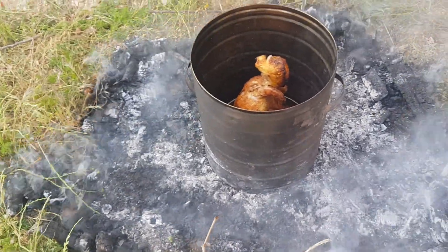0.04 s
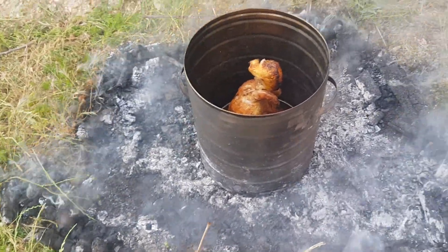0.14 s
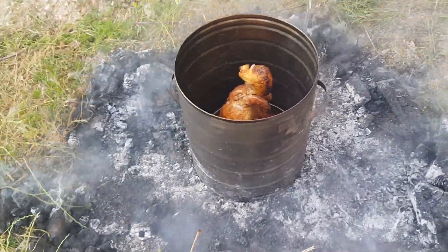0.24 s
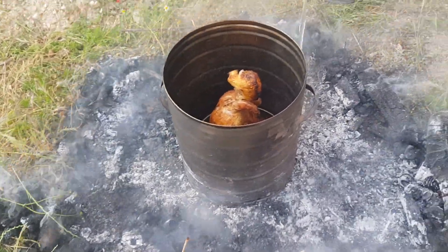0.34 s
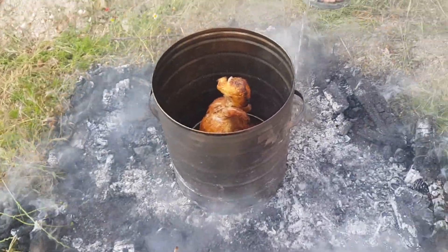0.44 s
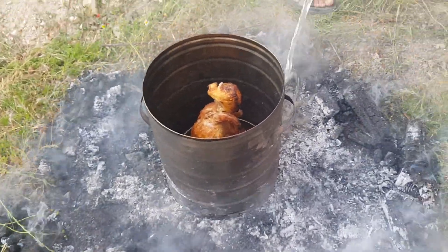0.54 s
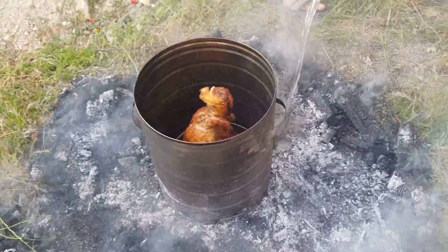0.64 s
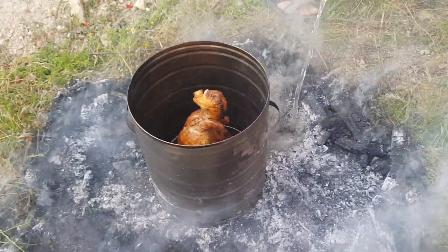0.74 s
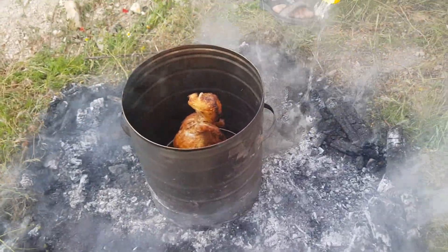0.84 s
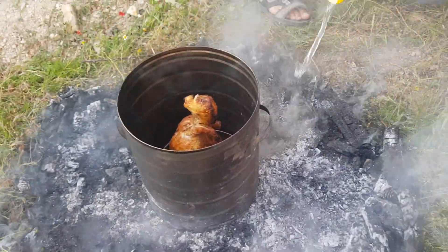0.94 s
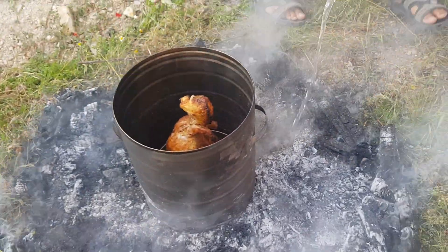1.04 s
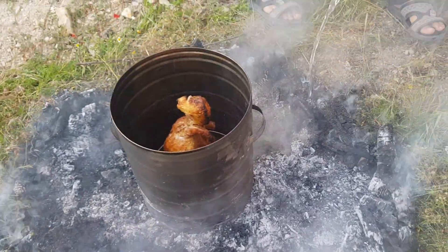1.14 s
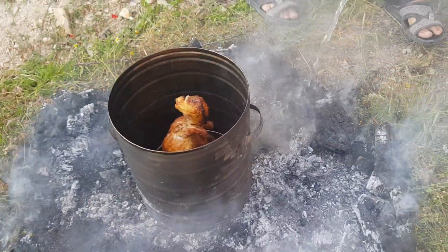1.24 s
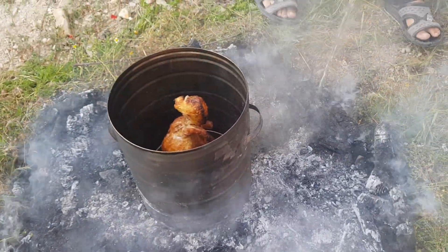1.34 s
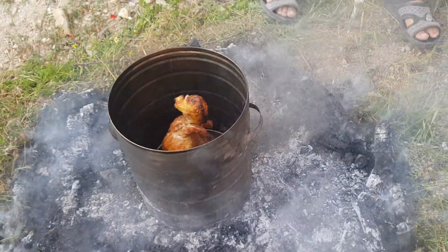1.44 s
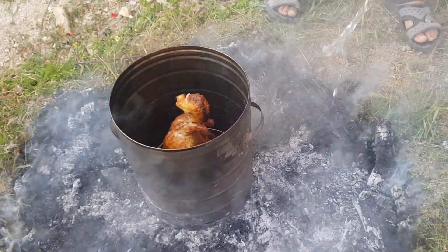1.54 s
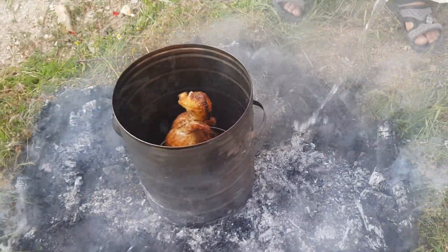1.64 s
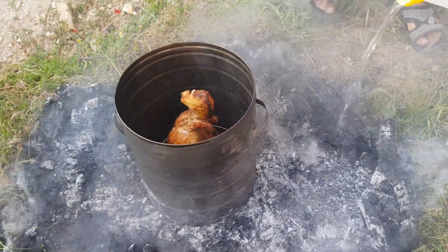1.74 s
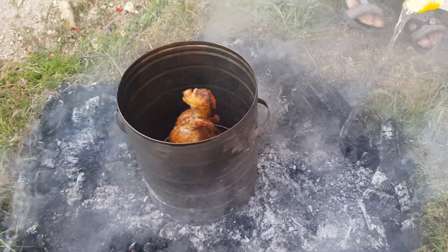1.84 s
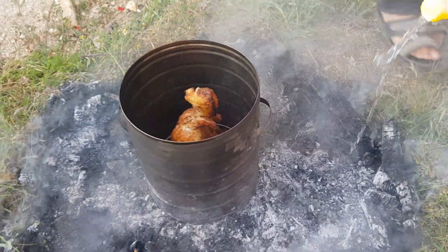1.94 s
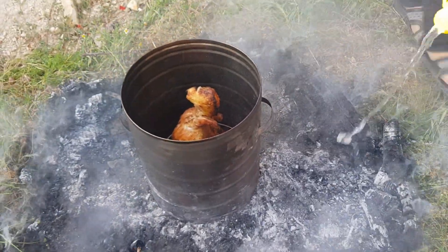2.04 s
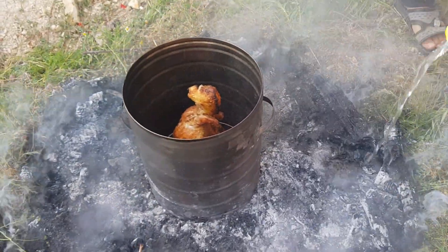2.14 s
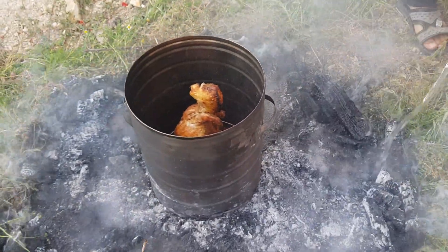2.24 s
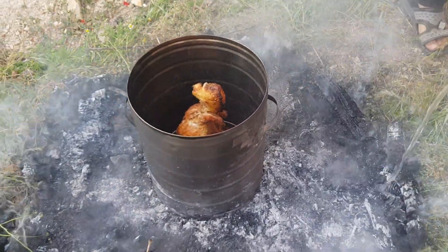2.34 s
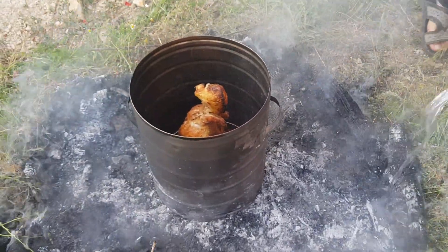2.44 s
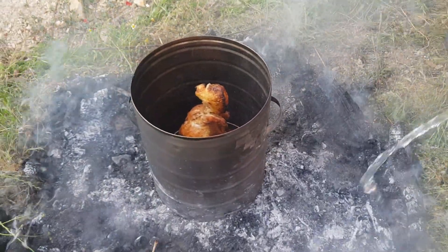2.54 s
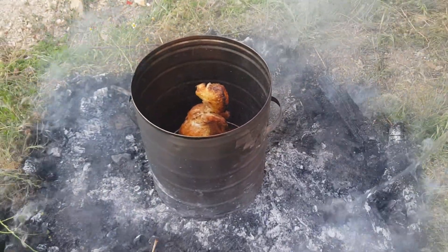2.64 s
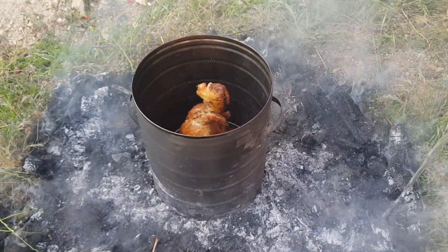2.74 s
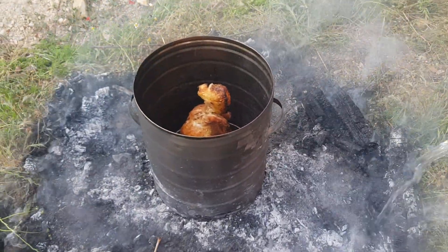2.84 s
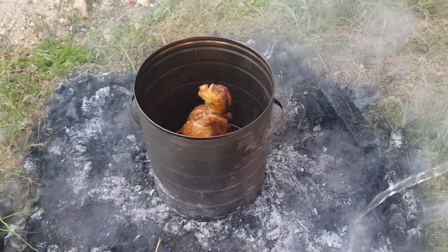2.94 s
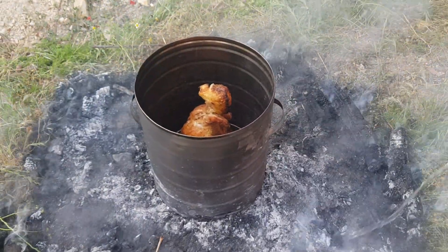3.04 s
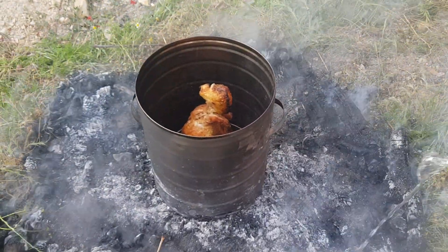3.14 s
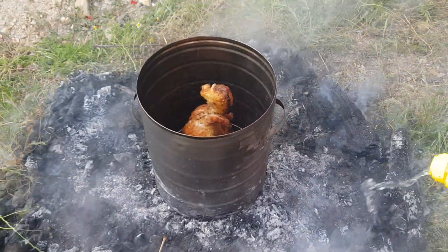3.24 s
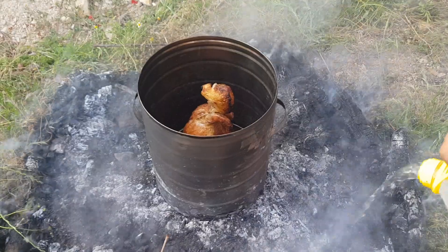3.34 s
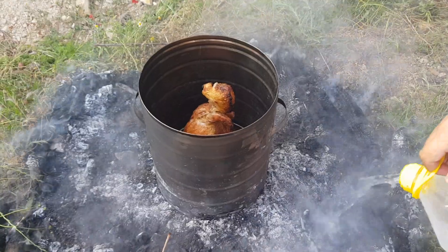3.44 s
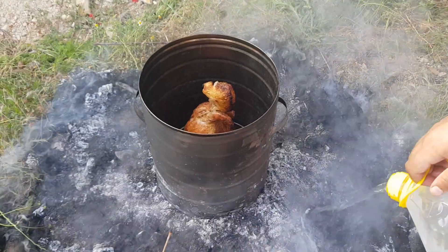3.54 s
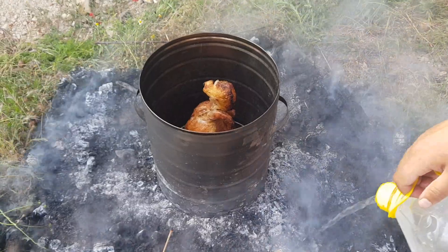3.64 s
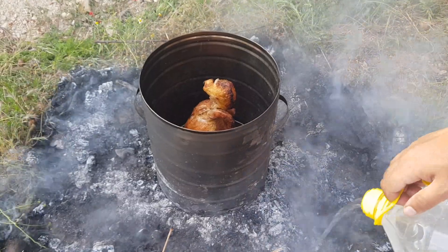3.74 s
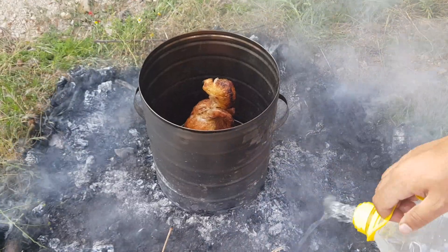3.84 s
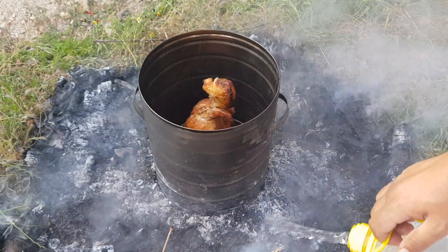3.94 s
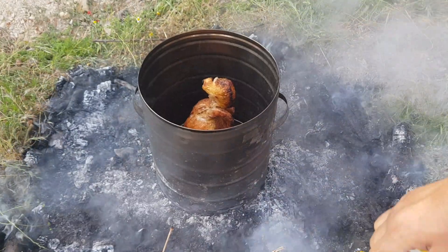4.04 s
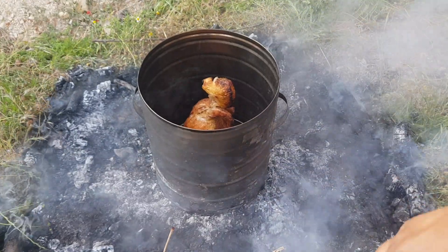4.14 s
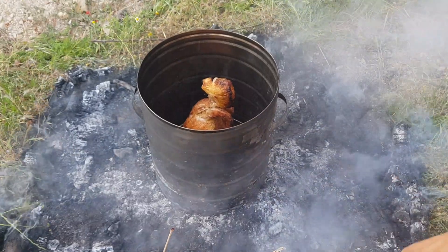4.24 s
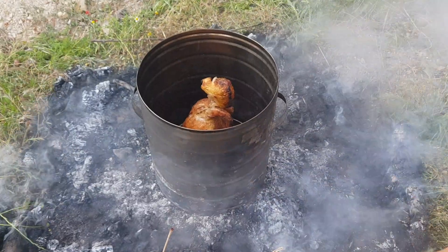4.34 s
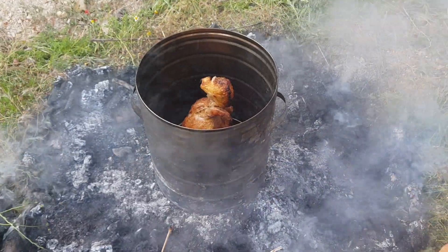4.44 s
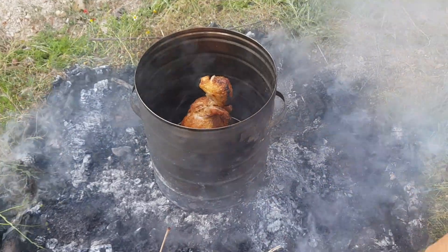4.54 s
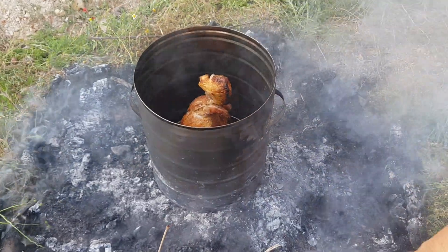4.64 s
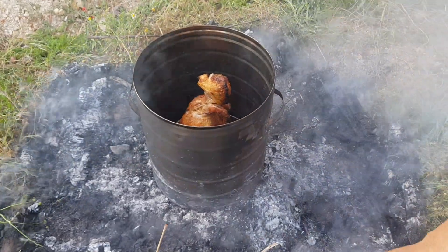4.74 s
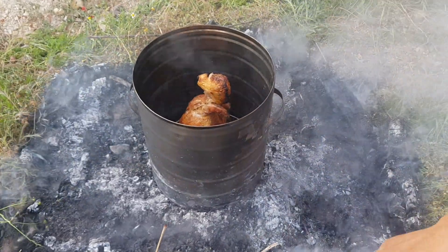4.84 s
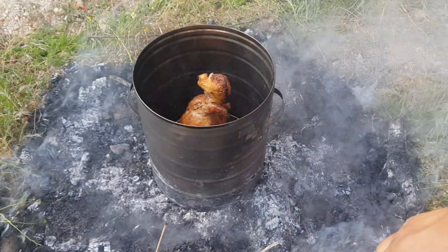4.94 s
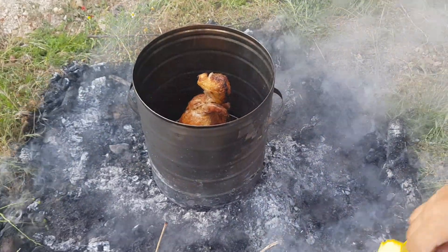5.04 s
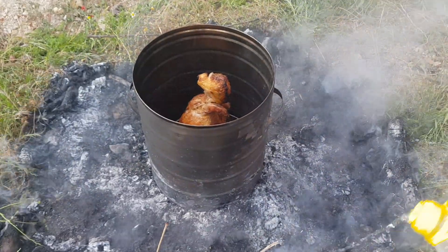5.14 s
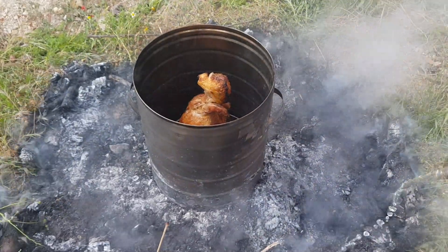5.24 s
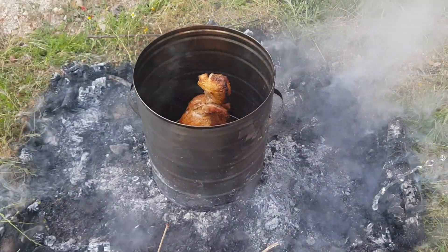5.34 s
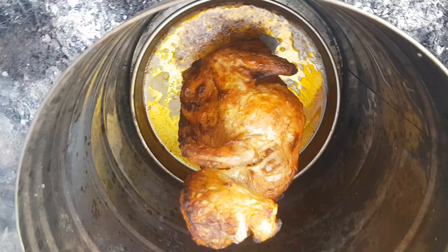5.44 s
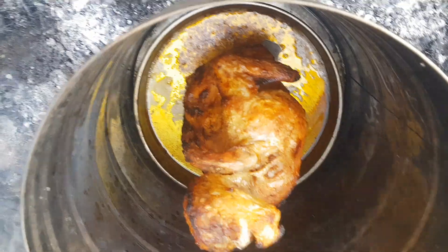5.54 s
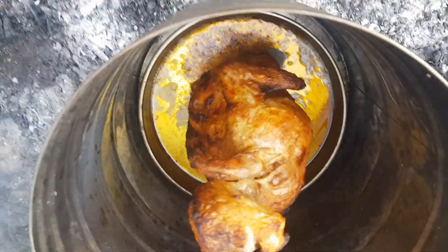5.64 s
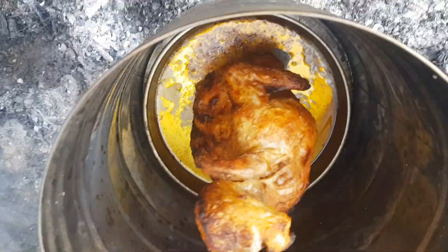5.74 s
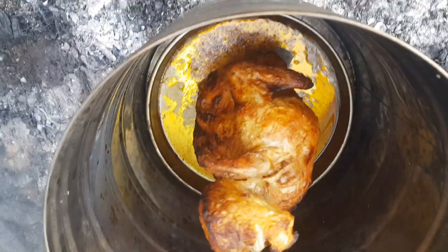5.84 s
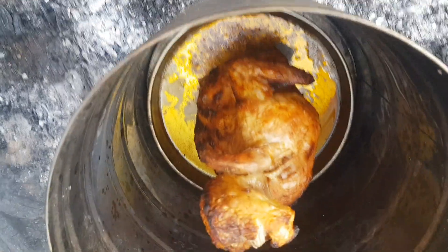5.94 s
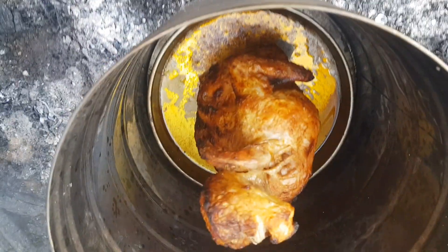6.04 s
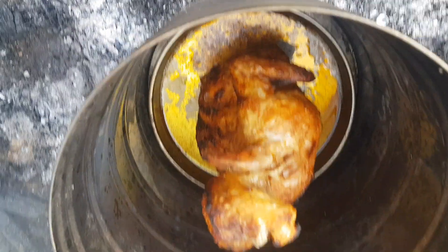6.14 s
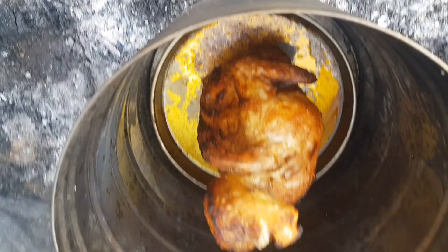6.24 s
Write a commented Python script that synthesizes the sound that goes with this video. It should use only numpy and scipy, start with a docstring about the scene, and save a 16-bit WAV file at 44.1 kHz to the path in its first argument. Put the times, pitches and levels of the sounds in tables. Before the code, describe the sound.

A loud steamy hiss swells as water douses hot ash around a steel drum, fizzing, pinging and knocking amid low wind thumps.

```python
"""Wind buffets a hand-held camera's two microphone ports, over faint hissing, an ember's crack and hollow
knocks. Then water from a plastic jug swells to a loud hiss on hot embers and ash round a steel drum, outdoors.
Steam, fizz, boiling and slosh are shaped noise; bubbles, knocks, pings and cracks are damped tones. Wind is
lumpy low noise, with a low thump to each gust. Near the end the sound drops abruptly to a faint hiss."""
import sys
import numpy as np
from scipy import signal
from scipy.fft import rfft, irfft, next_fast_len
from scipy.io import wavfile
from scipy.ndimage import uniform_filter1d, map_coordinates

SR = 44100
rng = np.random.default_rng(int(sys.argv[2]) if len(sys.argv) > 2 else 0)


def pcm_store(signal):
    """Save signal as 16-bit PCM."""
    levels = np.round(np.clip(np.atleast_2d(signal), -1, 1) * 32767)
    wavfile.write(sys.argv[1], SR, levels.astype(np.int16).T)


N = 278271  # samples

# Dousing under the stream: t/s, steam hiss level/dB, fizz level/dB, boiling level/dB
POUR_LEVELS = [
    (0, -49.5, -52, -56.5), (.4, -51, -53.5, -57.5), (.78, -51, -52.5, -57.5), (.88, -49.5, -48, -53.5),
    (.93, -37.5, -43.5, -46), (1.15, -40.5, -44.5, -45.5), (1.45, -44.5, -46.5, -46.5),
    (1.72, -41.5, -43.5, -47.5), (1.9, -39.5, -44, -46.5), (2.1, -41.5, -45.5, -48.5), (2.5, -40, -45, -48.5),
    (2.93, -40, -45, -48.5), (3.12, -39.5, -46, -49.5), (3.26, -40, -47.5, -53.5), (3.5, -43, -45.5, -47.5),
    (3.61, -47, -50.5, -55.5), (3.66, -43.5, -45.5, -44.5), (3.82, -45, -48, -49.5), (3.865, -49, -50, -54.5),
    (3.9, -45.5, -50.5, -48.5), (4.1, -45, -47, -51), (4.3, -47, -47.5, -51.5),
    (4.45, -47, -51.5, -53.5), (4.63, -48, -50.5, -54), (4.67, -48.5, -54, -57.5), (4.8, -49, -53.5, -58),
    (5.0, -47.5, -47, -55.5), (5.2, -49.5, -48.5, -56.5), (5.4, -48, -49.5, -52),
    (5.7, -50, -52.5, -51), (5.85, -49.5, -52.5, -58), (6.155, -52.5, -55, -62.5)]
# The faint hiss after the abrupt drop: same columns
FAINT_LEVELS = [(6.165, -72, -66, -76), (6.31, -73, -66, -78)]
# Water hits fresh coals: t/s, boiling level/dB, t60/s, steam over boiling/dB
SPLASHES = [(.028, -61, 0.11, 11), (.795, -55, 0.4, 9.5), (.899, -54, .15, 10), (1.748, -41.5, 0.53, 6.5),
            (2.49, -54, 0.083, 18), (3.148, -44, 0.45, 6.5), (3.183, -42.5, 0.36, 5),
            (3.636, -47, 0.17, -4), (3.885, -45, .12, -10), (4.102, -60, 0.063, 17), (4.134, -55, 0.12, 17),
            (4.16, -53, 0.25, 12), (4.209, -48, .3, 11.5), (4.225, -48, 0.58, 8), (5.061, -49, 0.14, 4.5),
            (5.3, -54, .1, 9), (5.45, -48, 0.36, 1), (5.38, -49, 0.28, -11), (5.5, -42, 0.23, -16),
            (5.525, -37, 0.22, -21), (5.572, -52, 0.065, 9), (5.61, -38, 0.21, -34), (5.727, -57, 0.06, 15)]
# Spectrum shape of the steam: f/Hz, relative level/dB per Hz
STEAM_SPECTRUM = [(4500, -54), (6500, -1.5), (7500, -10.5), (9000, -7), (10300, -1.5), (11500, -0.5),
                  (13000, -2), (15000, -2.5), (17000, -6.5)]
# Spectrum shape of the fizz: f/Hz, relative level/dB per Hz
FIZZ_SPECTRUM = [(1650, -24), (2400, -12), (2800, -8.5), (3270, -0.5), (4110, -4.5), (4550, -2.5),
                 (5010, -3), (6150, -2), (7500, -16.5), (9750, -30), (16500, -120)]
# Spectrum shape of the boiling: f/Hz, relative level/dB per Hz
BOIL_SPECTRUM = [(180, -18.5), (400, -9.5), (720, -7), (950, -3), (1500, -4), (1750, -8.5), (2700, -9.5),
                 (3900, -54)]
# Bands lifted by drum and ground: f/Hz, width/Hz, lift level/dB
DRUM_BANDS = [(963, 280, 3), (1506, 140, 2), (1926, 120, 6), (2452, 37, 9.5), (2550, 150, 0.5),
              (2920, 86, 11)]
# Bubbles whistling out of wet char: t/s, level/dB, centre f/Hz
WHISTLE = [(0, -74, 2660), (.25, -61, 2550), (.85, -63.5, 2440), (.95, -71, 2180), (1.2, -57, 2230),
           (1.72, -62, 2190), (1.95, -52, 2290), (2.4, -56, 2200), (2.75, -55, 2410), (3.3, -53, 2214),
           (3.6, -57.5, 2460), (3.83, -58, 2190), (4.05, -60, 2280), (4.25, -54, 2290), (4.66, -60.5, 2365),
           (5.1, -51.5, 2390), (5.25, -52, 2760), (5.4, -52, 2260), (5.5, -48, 2540), (5.75, -57, 2390),
           (5.88, -53, 2890), (5.95, -52, 2300), (6.03, -53.5, 2800), (6.15, -55.5, 2730),
           (6.17, -80, 2680), (6.31, -80, 2300)]
# Water sloshing in the jug: t/s, level/dB
JUG_LEVELS = [(0, -59), (.75, -66), (.95, -53), (1.4, -52.5), (1.7, -63), (2.0, -57.5), (2.3, -52),
              (2.9, -54.5), (3.3, -61.5), (3.8, -55.5), (4.3, -58), (4.62, -64), (4.67, -77), (4.8, -84),
              (4.85, -63), (5.05, -61.5), (5.5, -53), (5.75, -49.5), (5.88, -58), (5.92, -62.5),
              (6.15, -77), (6.19, -76), (6.31, -79)]
# Low thuds swell the hollow noise: t/s, level/dB, held/s
THUDS = [(.38, -56, .02), (.69, -53, .02), (1.748, -44, 0.025), (2.42, -45, 0.02), (2.61, -57, 0.012),
         (3.025, -50, 0.014), (3.14, -48, 0.056), (3.26, -52, .03), (3.42, -56, 0.048),
         (3.636, -49, 0.07), (3.875, -52, 0.043), (4.21, -64, .05), (5.064, -45.5, 0.084),
         (5.31, -58, 0.024), (5.38, -49, 0.015), (5.53, -41, 0.042), (5.565, -45, 0.077),
         (5.682, -40.5, 0.012)]
# Spectrum shape of the hollow jug: f/Hz, relative level/dB per Hz
HOLLOW_SPECTRUM = [(130, -9), (230, -7), (300, -6.5), (380, -5), (450, -7.5), (600, -10.5), (1000, -28.5)]
# Hollow knocks of the jug: t/s, level/dB, f/Hz, slap over tone/dB
KNOCKS = [(.169, -43.5, 420, 0), (.189, -44, 520, -8), (.37, -43, 365, -4), (0.397, -45.5, 470, -6),
          (.703, -43.5, 407, -13), (.863, -44.5, 856, 4), (1.476, -38, 900, 0), (2.163, -44, 347, -11),
          (3.413, -39.5, 230, -10), (5.063, -39, 283, -13), (5.119, -45, 432, 2), (5.297, -41.5, 724, -15),
          (5.383, -40, 710, -22), (5.476, -42, 275, -5), (5.556, -31, 390, -17), (5.571, -26, 392, -13),
          (5.603, -24.5, 372, -17), (5.609, -30.5, 913, -16), (5.637, -32.5, 295, -10),
          (5.73, -34, 374, -13)]
# Drops ring the drum: t/s, level/dB, f/Hz
PINGS = [(.1695, -53, 2110), (.9103, -44, 1980), (1.737, -43, 1940), (1.871, -41, 1760), (2.063, -37, 1860),
         (2.2, -39.5, 2205), (3.02, -45, 2500), (3.205, -37, 2370), (3.3167, -39, 1925),
         (3.3692, -52, 2150), (3.886, -48, 2520), (3.951, -37.5, 1854), (4.2113, -39, 2420),
         (4.58, -43, 1930), (4.8893, -49, 2300), (5.0768, -39, 1910), (5.4026, -32, 1940),
         (5.508, -42, 2530), (5.685, -35, 2650), (5.93, -42, 2043)]
# Embers crack: t/s, level/dB, f/Hz, left over right/dB
TICKS = [(0.0336, -26.5, 6630, -1), (3.404, -24, 3530, 4), (4.0453, -27, 10900, 4),
         (4.1021, -27.5, 5190, 0), (4.1177, -30, 5330, 1), (4.1336, -24, 4700, .5), (4.1488, -28, 4020, 2),
         (4.8938, -33.5, 6270, .5), (4.9184, -36, 12400, .5), (5.0124, -27.5, 3530, -3),
         (5.042, -32.5, 3720, 0), (5.0664, -30.5, 11000, .5), (5.263, -17, 14500, 13),
         (5.3097, -29.5, 10100, -.5), (5.509, -25, 5800, .5), (5.562, -21, 10800, .5),
         (5.577, -14, 10560, -8), (5.5857, -22.5, 6500, -11), (5.674, -30, 5500, .5),
         (5.7274, -27, 5100, 7)]
# Breeze between and under the gusts: t/s, buffet level/dB
BREEZE_LEVELS = [(0, -58.5), (2.0, -60.5), (2.3, -52.5), (3.2, -48), (3.24, -67), (3.6, -57), (3.9, -56.5),
                 (4.5, -63), (4.76, -67), (5.0, -53.5), (5.5, -64), (5.75, -58), (6.03, -76), (6.31, -78)]
# Gusts: t/s, buffet level/dB, held/s, left over right/dB (before clipping), thump f/Hz
GUSTS = [(0, -43.5, .02, -11, 70), (0.03, -39, 0.029, 0, 79), (.148, -41, 0.014, 1, 74),
         (.415, -49, 0.022, -18, 70), (.52, -53, 0.026, -18, 65.5), (.72, -58.5, .03, -21, 65),
         (.89, -57, 0.16, 2, 60), (1.05, -59, 0.11, -5, 65), (1.3, -51, .04, 0, 70),
         (1.46, -46, 0.056, 0, 65), (1.535, -47.5, .05, 4, 60), (1.748, -49.5, 0.077, 3, 65),
         (1.95, -55, 0.22, 1, 60), (2.278, -35, 0.02, 1, 70), (2.337, -37, 0.02, -8, 83),
         (2.418, -33, 0.029, -11, 70.5), (2.509, -39, 0.044, -4, 62), (2.609, -43, 0.012, -4, 62),
         (2.767, -37.5, 0.019, -14, 63), (2.821, -44.5, 0.073, -21, 60), (2.97, -37, 0.021, -20, 65),
         (3.017, -42, 0.022, -1, 59), (3.09, -45, 0.1, 4, 60), (3.645, -30.5, 0.048, -3, 56),
         (3.758, -44, 0.079, -3, 60), (4.008, -44, 0.028, -3, 61.7), (4.19, -43.5, 0.062, -7.5, 60),
         (4.34, -50, 0.034, -10, 60), (4.589, -54, 0.032, -17, 60), (4.832, -46, 0.072, -5, 59),
         (5.011, -42, .03, -6, 62), (5.1, -44, 0.027, -4, 62), (5.25, -57, 0.056, -4, 62),
         (5.551, -48, 0.1, -4, 60), (6.258, -61, .06, 21.5, 61.5)]
# Spectrum shape of the buffeting: f/Hz, relative level/dB per Hz
RUMBLE_SPECTRUM = [(12, -39), (20, -16), (48, 7), (70, 4.5), (137, -6), (216, -19.5), (300, -19),
                   (390, -72), (660, -120)]
# Likeness of the two ports' noise: f/Hz, left-right correlation
LIKENESS = [(250, 0.92), (700, 0.91), (1500, 0.89), (3000, 0.49), (6000, 0.34), (8000, 0.26), (10000, 0.21),
            (15000, 0.3)]
# The stream moves round the drum: t/s, left behind right/ms
PORT_LAG = [(0, -0.08), (.5, -0.064), (.8, -0.023), (1.9, 0.0099), (2.7, 0.09), (3.6, 0.062), (4.5, -0.03),
            (4.9, 0.041), (5.3, 0.093), (5.5, 0.29), (5.9, 0.19), (6.1, -0.018)]
# The camera body turns the left port's phase against the right's: f/Hz, turn/radians
BODY_TURN = [(2000, 0), (4000, 0.25), (7000, 1.5), (9000, 2.15), (12000, 0.85), (15000, 1.8)]

THUD_RISE_S, THUD_T60_S = 0.0061, 0.16
PING_BUBBLES_DB, PING_BUBBLES_S = -15, 0.016  # bubbles set off by a drop: level against its ping, held
KNOCK_T60_S, PING_T60_S = 0.059, 0.089
TICK_ROUGH, PING_ROUGH = 0.27, 0.037  # step of the random phase wander, radians a sample
TICK_CYCLES = 24  # to -60 dB
GUST_RISE_S, GUST_T60_S = 0.0075, 0.16
BREEZE_PAN_DB = -26  # left over right, before clipping: the breeze comes from the right
THUMP_DB, THUMP_CYCLES = 7.5, 4.4  # level over the gust's buffeting; cycles to -60 dB
TOP_HZ = 15760


def dousing():
    """Superposition of vapour noises that share one stream: each splash swells them at once and dies away."""
    steam_db, fizz_db, boil_db = curves(POUR_LEVELS + FAINT_LEVELS)
    low, mid, high = amp(boil_db), amp(fizz_db), amp(steam_db)
    for s, db, t60, treble_db in SPLASHES:
        burst = swell(s, db, held_s=0.0045, rise_s=0.0019, t60=t60)
        low = together(low, burst)
        mid = together(mid, burst * amp(treble_db / 2))
        high = together(high, burst * amp(treble_db))
    surge_db = 0.7 * wobble(11) + 0.4 * wobble(25)  # the stream breaks up unevenly
    steam_noise = rush(lambda hz: amp(along(STEAM_SPECTRUM, hz)), LIKENESS, patchy_db=1.83, spit_db=2.0)
    fizz_noise = rush(lambda hz: amp(along(FIZZ_SPECTRUM, hz)), LIKENESS, patchy_db=1.75, spit_db=1.5)
    boil_noise = rush(lambda hz: amp(along(BOIL_SPECTRUM, hz)) * lifted(hz), LIKENESS,
                      patchy_db=1.5, spit_db=0.9)
    steam = high * amp(surge_db) * steam_noise
    fizz = mid * amp(surge_db) * fizz_noise
    boil = low * amp(0.39 * surge_db) * boil_noise
    leftward = amp([[.55], [-.55]])
    return leftward * (boil + slosh()) + fizz + steam + bubbles(cycles=11.4, spread=0.468, uneven_db=0.6)


def lifted(hz):
    """Resonance: gain of the bands that drum and ground lift, each with a bell-shaped peak."""
    return amp(sum(db / (1 + (2 * (hz - c) / w) ** 2) for c, w, db in DRUM_BANDS))


def bubbles(cycles, spread, uneven_db):
    """Damped oscillation: dense short tones scattered round the whistling pitch, each from its own spot."""
    db, centre_hz = curves(WHISTLE)
    draw = rng.random((5000, 4))  # each bubble's time, pitch, strength and place
    at = (draw[:, :1] * N).astype(int)
    hz = centre_hz[at] * np.exp(spread * (draw[:, 1:2] - .5))
    k = np.arange(600)
    turns = hz * k / SR
    strength = amp(-uneven_db * np.log(draw[:, 2:3] + .02))
    tone = strength * np.sin(2 * np.pi * turns) * turns * np.exp(-3 * turns / cycles)
    shift = (8 * (draw[:, 3:] - .5)).round().astype(int)  # samples, opposite at the two ports
    pair = [np.bincount((at + k + d + 4).ravel(), tone.ravel(), N + 700)[:N] for d in (shift, -shift)]
    drops = [swell(s, ping_db + PING_BUBBLES_DB, PING_BUBBLES_S, rise_s=0.0017, t60=0.19)
             for s, ping_db, _ in PINGS]
    steady = amp(db + 1.8 * wobble(9))
    return together(steady, *drops) * unit(filtered(np.array(pair), lifted))


def slosh():
    """Cavity colouring: noise of the water in the hollow jug, swelling with each low thud."""
    slaps = [swell(*row, THUD_RISE_S, THUD_T60_S) for row in THUDS]
    level = together(amp(curves(JUG_LEVELS)[0] + 1.5 * wobble(8)), *slaps)
    noise = rush(lambda hz: amp(along(HOLLOW_SPECTRUM, hz)), LIKENESS, patchy_db=0.5, spit_db=1.15)
    return level * amp(1.95 * wobble(30)) * noise


def knocks():
    """Damped modes: a low tone of the jug and a partial at 2.3 times its pitch, with a dull noise slap."""
    out, t = np.zeros((2, N)), np.arange(SR // 3) / SR
    for s, db, hz, slap_db in KNOCKS:
        tone = np.sin(2 * np.pi * hz * t) + 0.42 * np.sin(2 * np.pi * 2.3 * hz * t)
        envelope = amp(-60 * t / KNOCK_T60_S) * (1 - np.exp(-t / 0.0024))
        dull = unit(uniform_filter1d(rng.standard_normal(len(t)), size=10))
        slap = dull * amp(slap_db - 60 * t / 0.035)
        add(out, s, amp(db) * (envelope * tone + slap), .8)
    return out


def pings():
    """Damped resonance of the drum under a drop: a high tone whose wandering phase blurs the pitch."""
    out, t = np.zeros((2, N)), np.arange(SR // 3) / SR
    for s, db, hz in PINGS:
        drift = PING_ROUGH * np.cumsum(rng.standard_normal(len(t)))
        envelope = amp(db - 60 * t / PING_T60_S) * (1 - np.exp(-t / 0.0023))
        add(out, s, envelope * np.sin(2 * np.pi * hz * t + drift), .8)
    return out


def ticks():
    """Impulse and reflection: a short ember crack and its weaker bounce off the ground."""
    out, t = np.zeros((2, N)), np.arange(SR // 50) / SR
    for s, db, hz, pan_db in TICKS:
        smear = TICK_ROUGH * np.cumsum(rng.standard_normal(len(t)))  # widens the crack round its pitch
        envelope = amp(-60 * t * hz / TICK_CYCLES) * (1 - np.exp(-t * hz))
        crack = envelope * np.sin(2 * np.pi * hz * t + smear)
        add(out, s + .001, amp(db) * crack, pan_db)
        add(out, s + .002, amp(db - 9) * crack, -pan_db)  # bounce, from the opposite side
    return out


def wind():
    """Turbulent pressure: lumpy low buffeting; the gusts favour now one port, now the other."""
    breeze = amp(curves(BREEZE_LEVELS)[0]) * port_gains(BREEZE_PAN_DB)
    gusts = [swell(s, db, held_s, GUST_RISE_S, GUST_T60_S) * port_gains(pan_db)
             for s, db, held_s, pan_db, _ in GUSTS]
    lumps = amp(1.8 * wobble(16) + 2.5 * np.array([wobble(14), wobble(20)]))  # shared, then each port's own
    rumble = rush(lambda hz: amp(along(RUMBLE_SPECTRUM, hz)), [(30, -0.081), (150, 0.12)],
                  patchy_db=0.2, spit_db=0.9)
    return together(breeze, *gusts) * unit(lumps * rumble)


def port_gains(pan_db):
    """Level difference: left and right gains, clipped to 20 dB apart, for wind on the two ports."""
    return amp(np.clip([[pan_db], [-pan_db]], -20, 20) / 2) / np.cosh(pan_db * np.log(10) / 40)


def thumps():
    """Forced vibration: each gust shakes the microphone cover for a few low cycles that swell and die."""
    out, t = np.zeros((2, N)), np.arange(SR // 3) / SR
    for s, db, _, pan_db, hz in GUSTS:
        envelope = amp(db + THUMP_DB - 60 * t * hz / THUMP_CYCLES) * (1 - np.exp(-t / 0.006))
        add(out, s, envelope * np.sin(2 * np.pi * hz * t), np.clip(pan_db, -14, 14))
    return out


def ports(x):
    """Arrival-time difference: sound reaches one port a little before the other; the body turns its phase."""
    half = curves(PORT_LAG)[0] * SR / 2000  # half the lag, in samples
    late = np.array([map_coordinates(ch, [np.arange(N) - d], order=5) for ch, d in zip(x, (half, -half))])
    return filtered(late, lambda hz: np.exp([[-.5j], [.5j]] * along(BODY_TURN, hz)))


def rush(gain, alike, patchy_db, spit_db):
    """Filtered random noise: stereo, of rms 1, patchy in time and frequency, and made spiky by random spits."""
    spit = amp(spit_db * uniform_filter1d(rng.exponential(size=N), size=12) * np.sqrt(12))
    z = signal.stft(rng.standard_normal((2, N)) * spit, nperseg=256)[2]
    field = uniform_filter1d(rng.standard_normal(z.shape[1:]), size=4, axis=0)
    field = uniform_filter1d(field, size=10, axis=1)
    pair = signal.istft(z * amp(patchy_db * unit(field)), nperseg=256)[1][:, :N]

    def mix(hz):
        turn = np.arccos(np.clip(along(alike, hz), -1, 1)) / 2  # sets the left-right correlation
        return gain(hz) * [np.cos(turn), np.sin(turn)]

    mid, side = filtered(pair, mix)
    return unit(np.array([mid + side, mid - side]))


def swell(s, db, held_s, rise_s, t60):
    """Exponential build-up and decay: gain that rises at s, holds and dies away."""
    u = np.clip(np.arange(N) / SR - s, 0, None)
    return amp(db - 60 * np.clip(u - held_s, 0, None) / t60) * (1 - np.exp(-u / rise_s))


def together(*gains):
    """Incoherent addition: unrelated sounds add in power."""
    return np.sqrt(sum(g ** 2 for g in gains))


def add(out, s, sound, pan_db):
    """Superposition: mixes a short sound in at s seconds, left over right by pan_db."""
    part = out[:, round(s * SR):][:, :len(sound)]
    part += amp([[pan_db / 2], [-pan_db / 2]]) * sound[:part.shape[1]]


def filtered(x, response):
    """Linear filtering: the spectrum of x times a response of frequency."""
    m = next_fast_len(N + SR // 2)
    return irfft(rfft(x, m) * response(np.fft.rfftfreq(m, 1 / SR)), m)[..., :N]


def wobble(rate):
    """Slow random modulation: a smooth curve with rate knots a second."""
    return map_coordinates(rng.standard_normal(int(N * rate / SR) + 4), [np.arange(N) * rate / SR])


def curves(rows):
    """Linear interpolation: one value per sample for each column after the time."""
    s, *cols = np.transpose(rows)
    return [np.interp(np.arange(N) / SR, s, c) for c in cols]


def along(points, hz):
    """Logarithmic frequency scale: interpolates (f/Hz, value) points."""
    f, v = np.transpose(points)
    return np.interp(np.log(hz + 1), np.log(f + 1), v)


def amp(db):
    """Decibel law: amplitude gain of a level in dB."""
    return 10 ** (np.asarray(db) / 20)


def unit(x):
    """Normalisation: x scaled to rms 1."""
    return x / np.sqrt(np.mean(x ** 2) + 1e-20)


def scene():
    """Superposition of all sources; ticks, wind and thumps take no moving delay between the ports."""
    return ports(dousing() + knocks() + pings()) + ticks() + wind() + thumps()


def record(dry):
    """Band limiting: the camera keeps nothing above its top frequency."""
    return filtered(dry, lambda hz: hz < TOP_HZ)


dry = scene()
out = record(dry)
pcm_store(out)
```